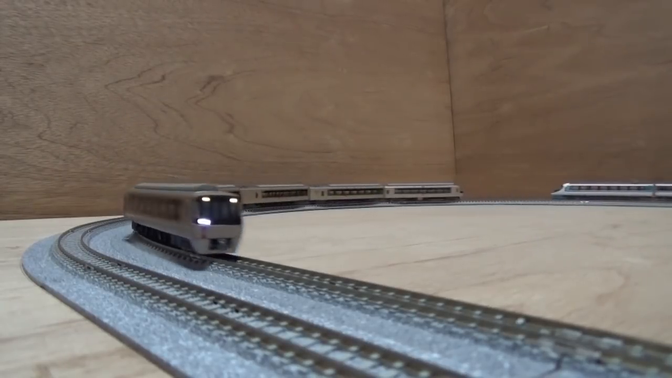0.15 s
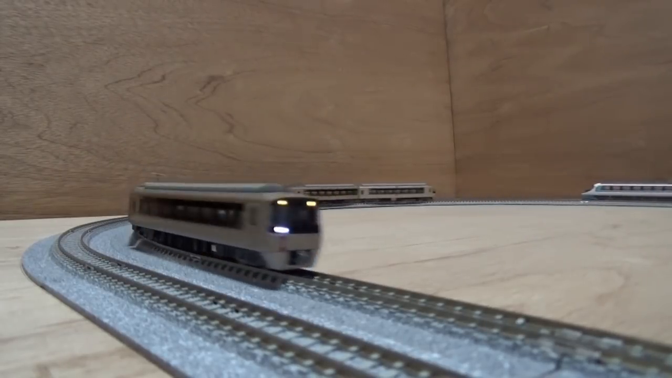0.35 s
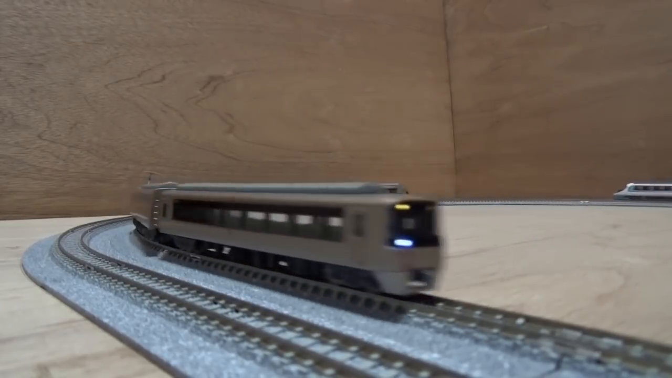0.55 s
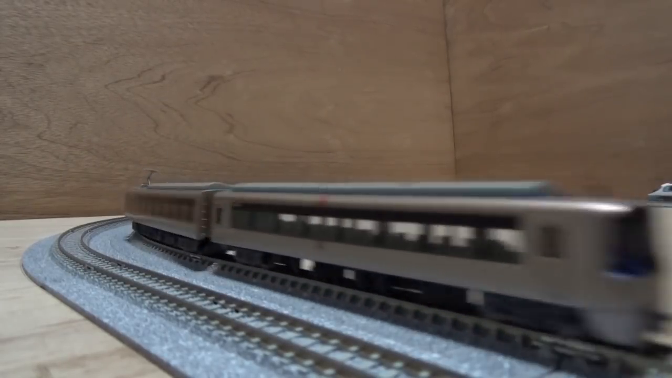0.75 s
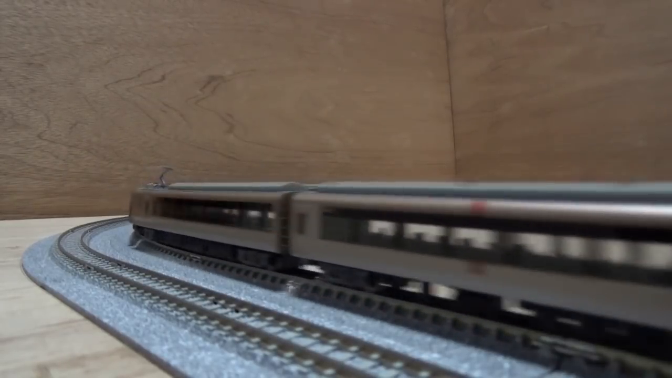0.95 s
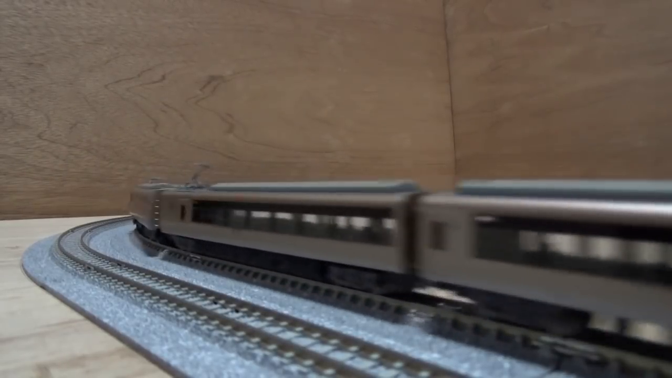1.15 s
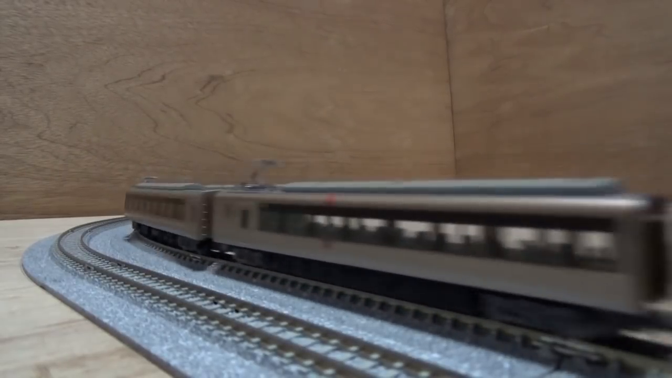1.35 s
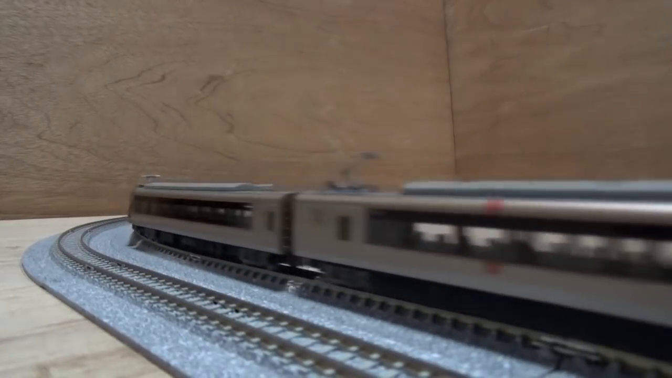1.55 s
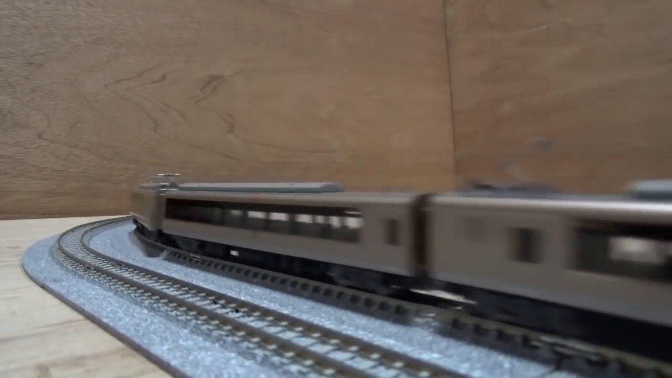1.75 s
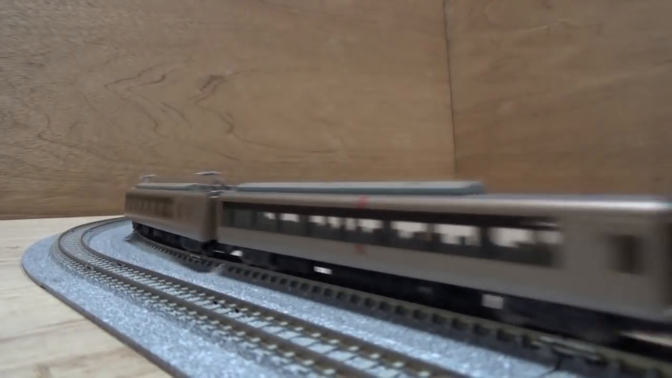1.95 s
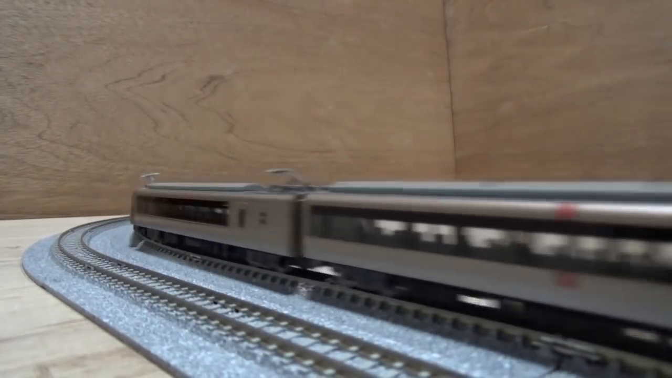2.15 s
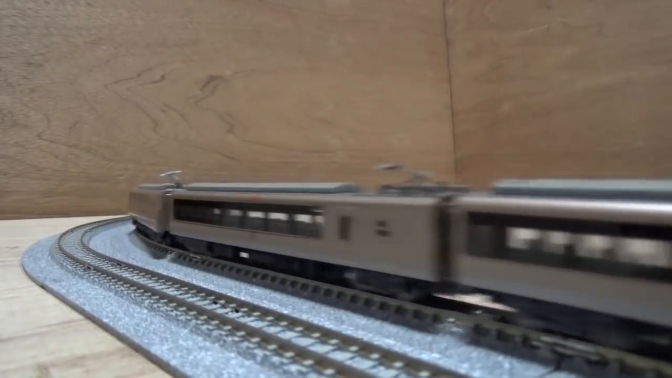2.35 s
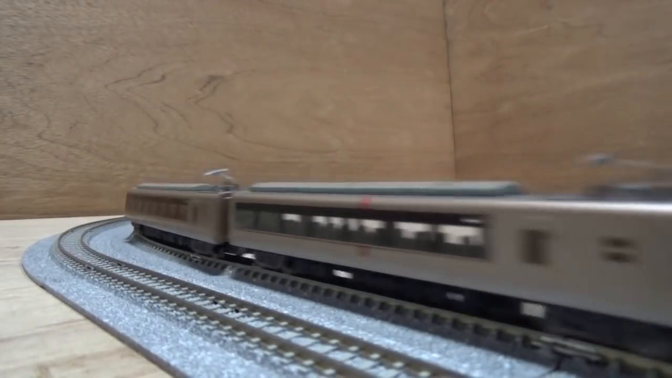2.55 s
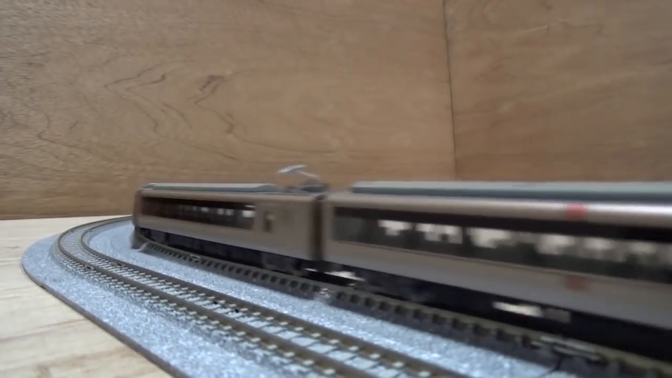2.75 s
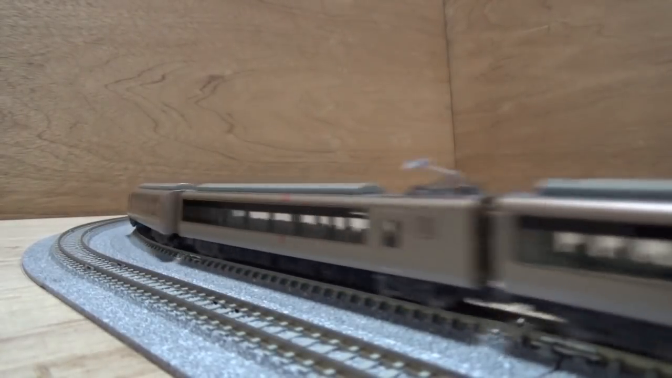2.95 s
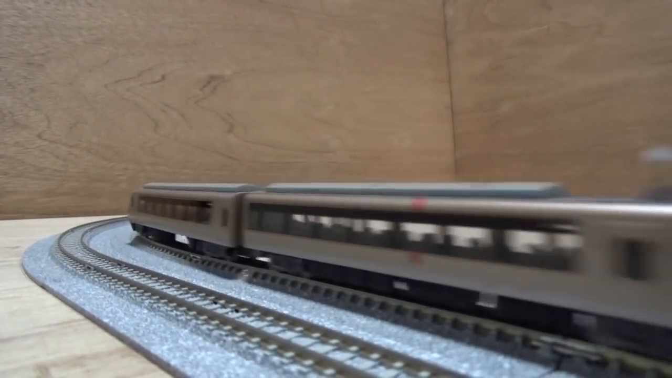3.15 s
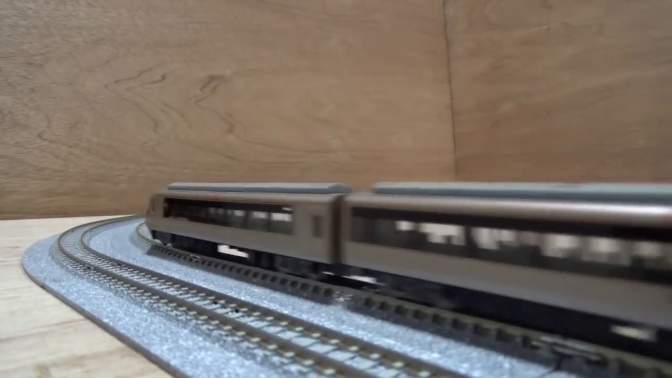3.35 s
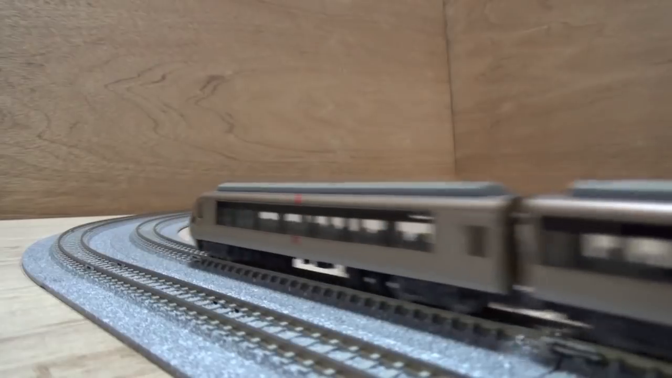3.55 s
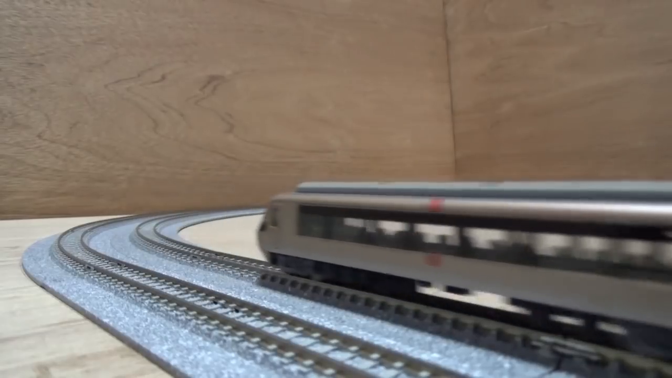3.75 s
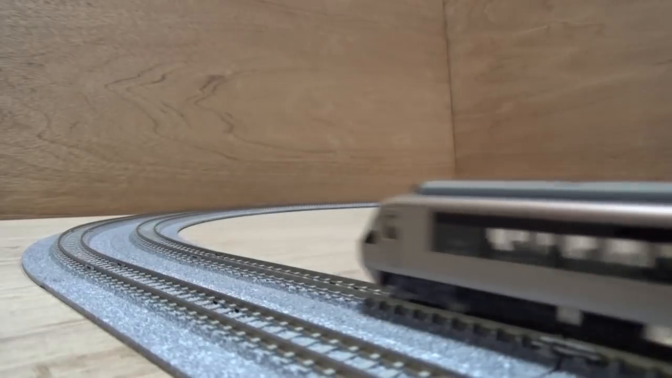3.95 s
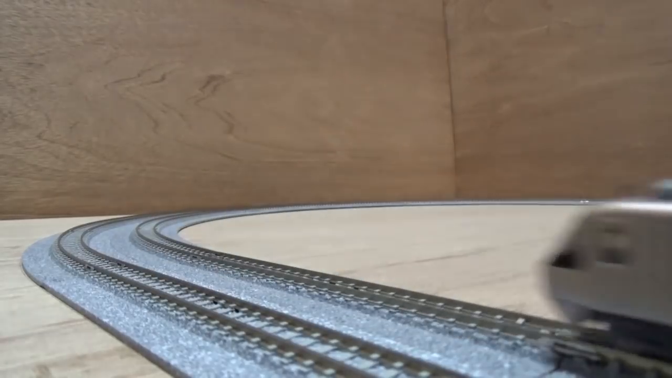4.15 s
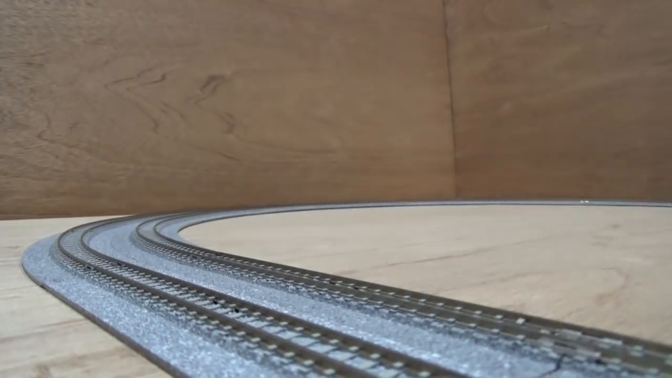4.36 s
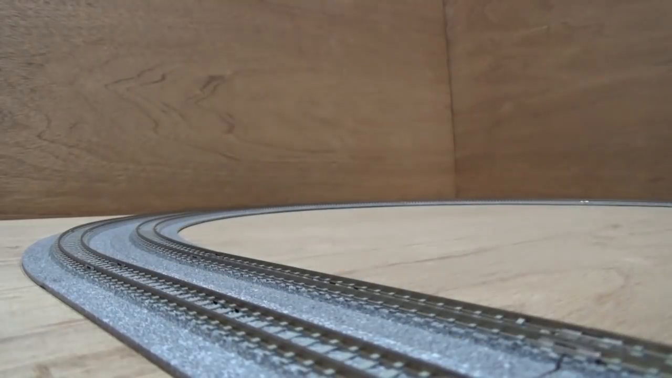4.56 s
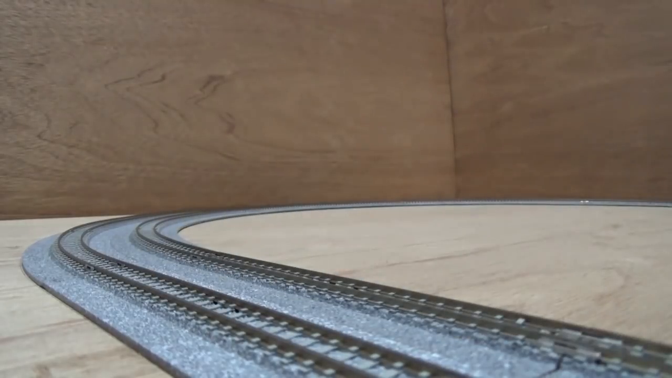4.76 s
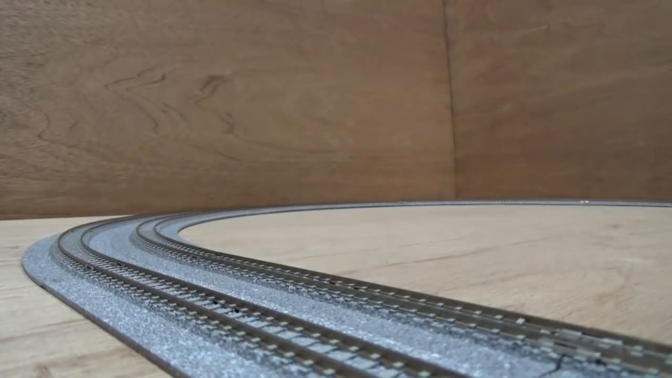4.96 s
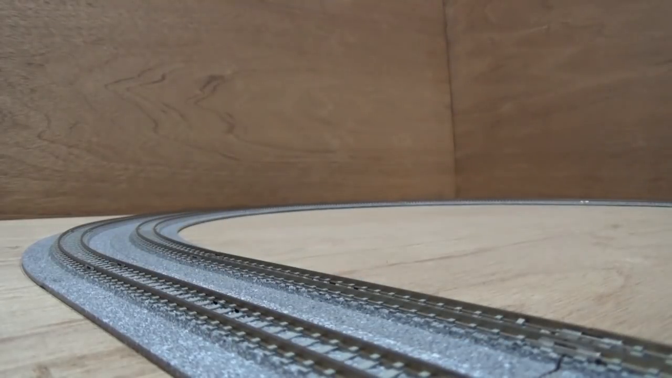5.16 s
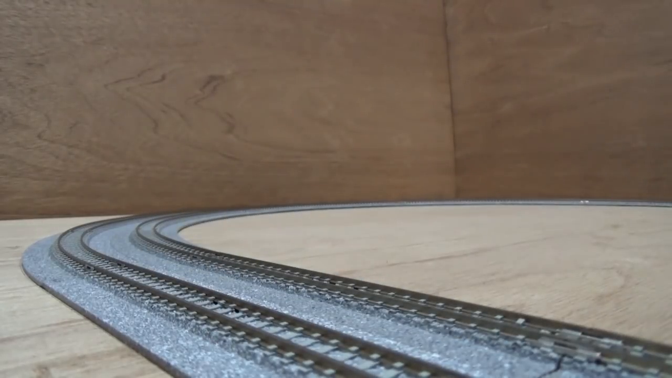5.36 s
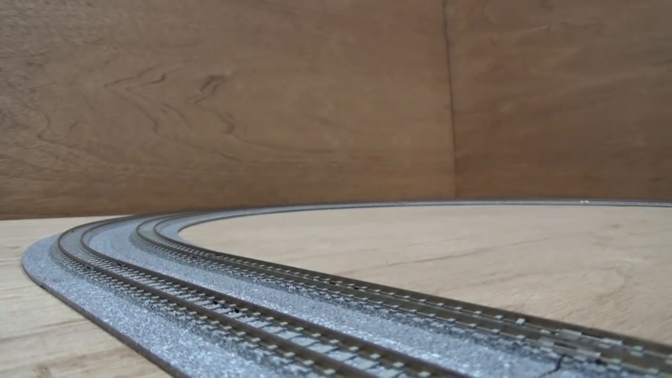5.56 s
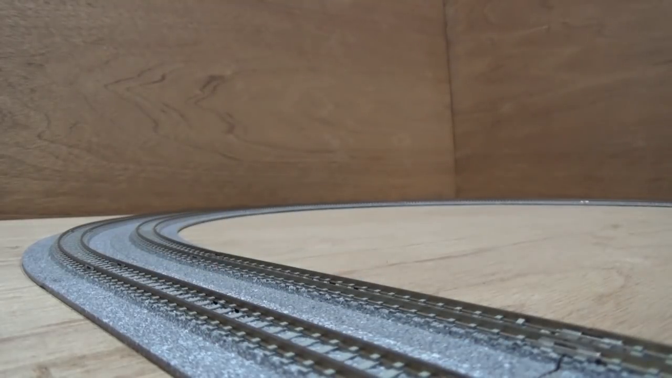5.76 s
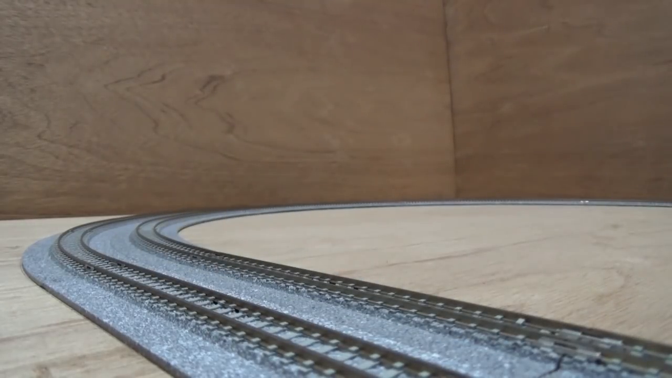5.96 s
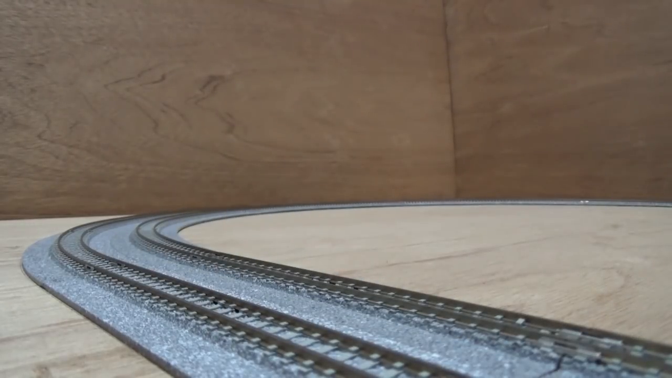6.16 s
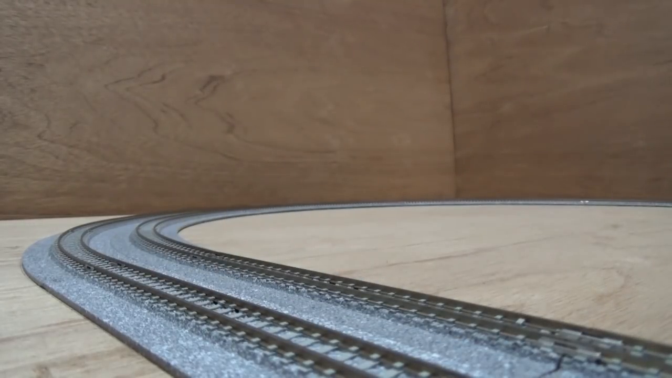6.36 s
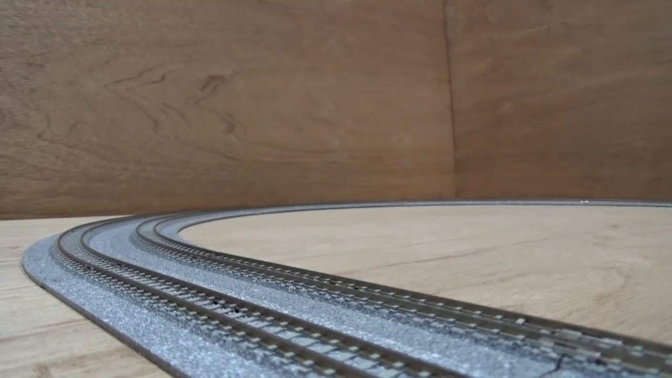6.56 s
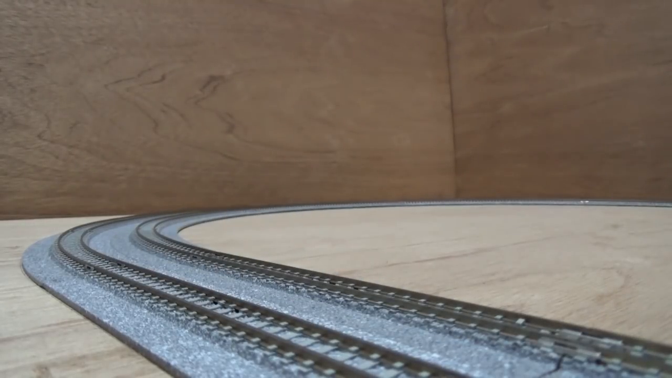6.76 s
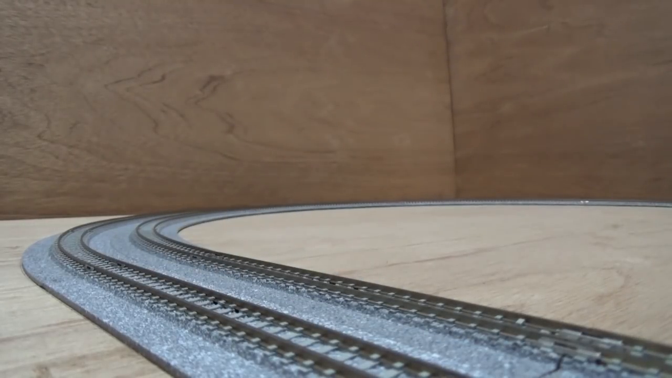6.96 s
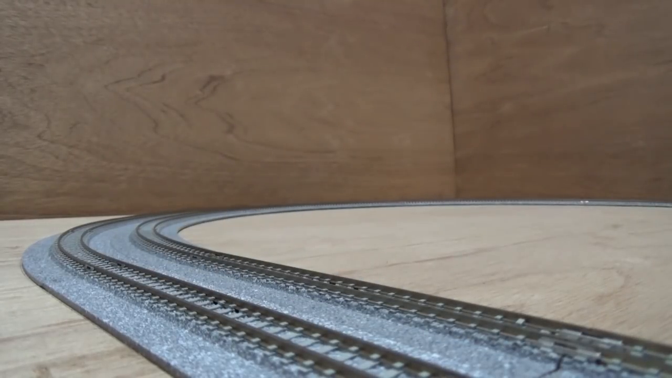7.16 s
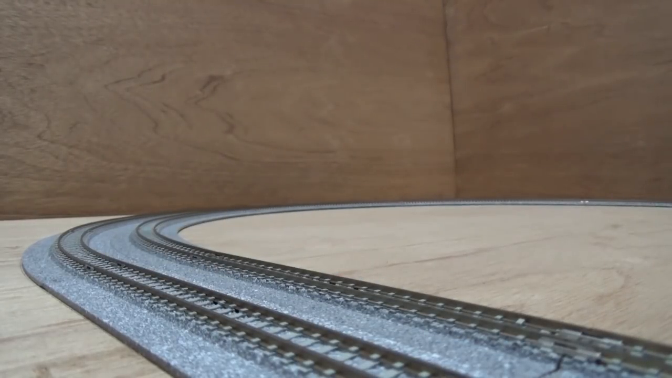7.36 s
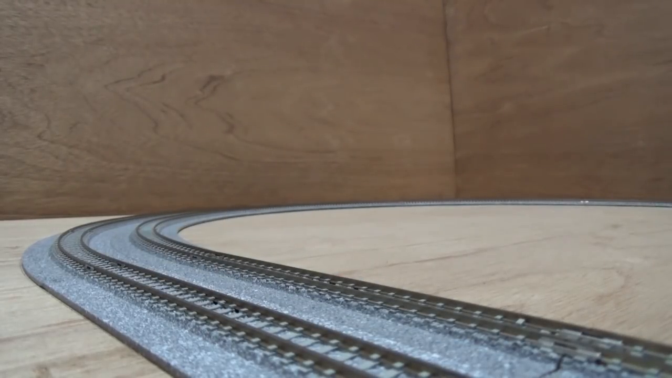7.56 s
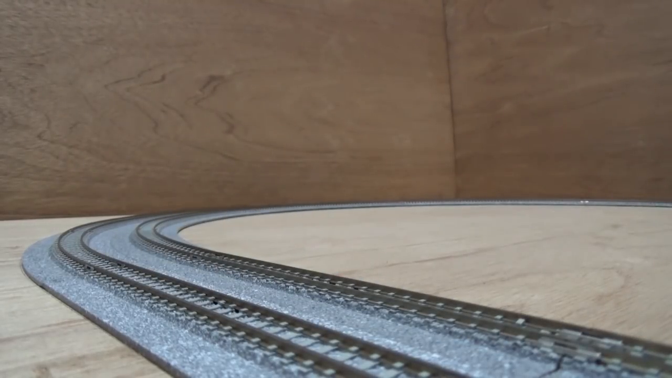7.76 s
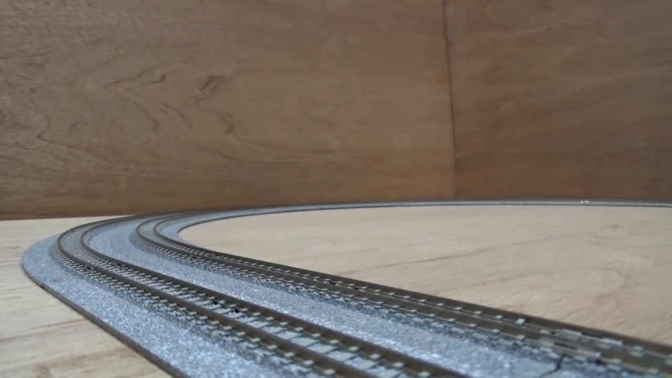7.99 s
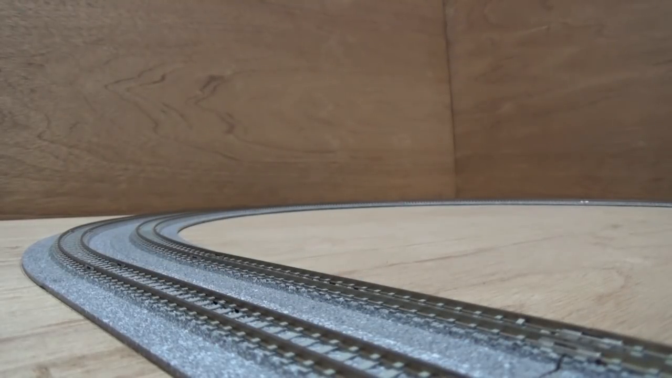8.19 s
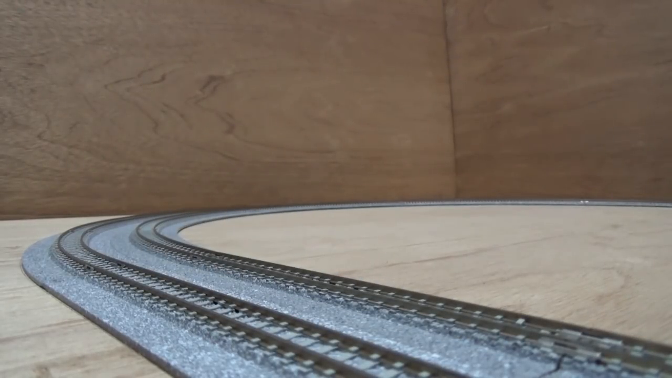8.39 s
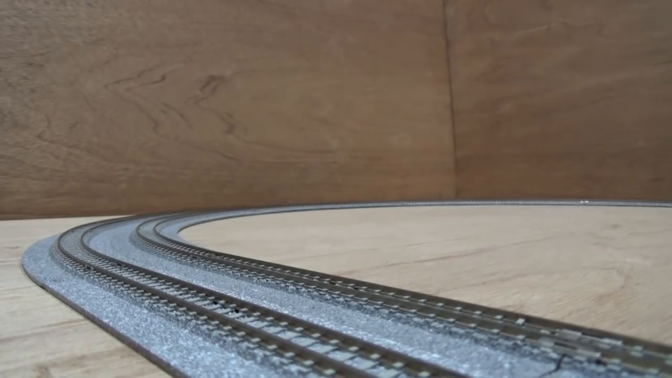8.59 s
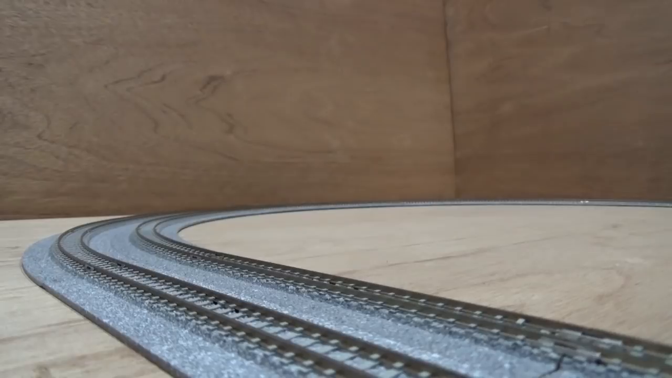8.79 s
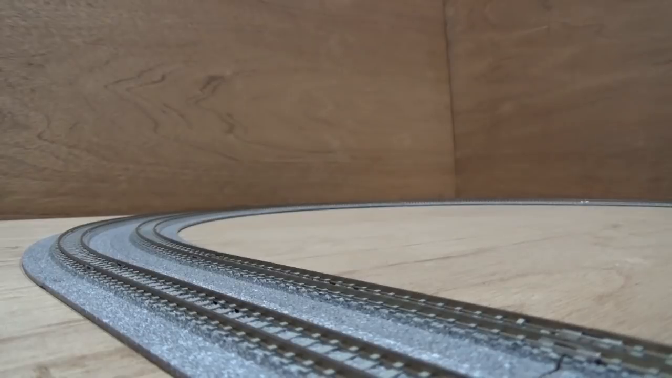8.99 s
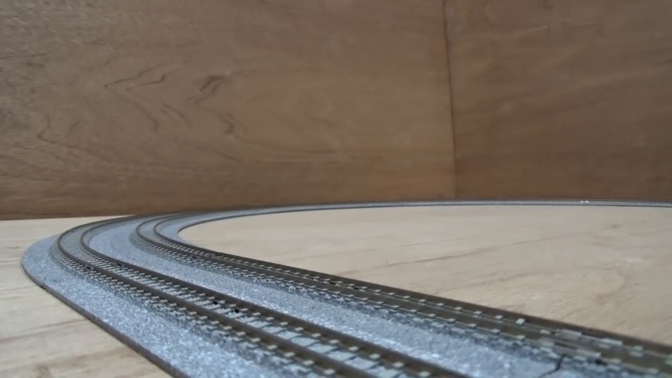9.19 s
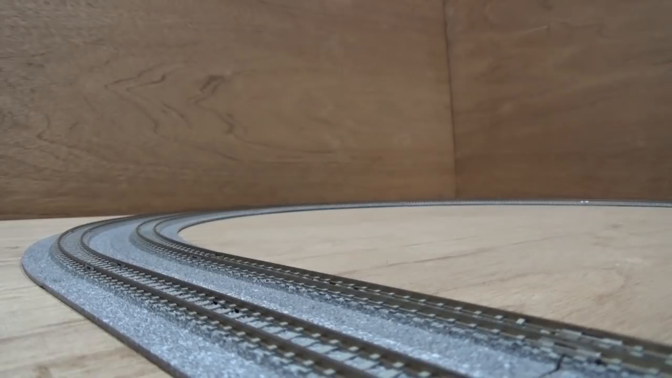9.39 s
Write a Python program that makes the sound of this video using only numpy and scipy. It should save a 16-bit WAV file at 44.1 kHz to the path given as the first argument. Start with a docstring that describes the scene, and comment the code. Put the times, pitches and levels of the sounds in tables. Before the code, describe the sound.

A small model train runs round a curved track on a plywood board, heard from a microphone close to the rails in a quiet room. From 0 s its wheels give a steady, bright, gritty hiss, rising gradually to its fullest at about 2-3 s, with slight flutter, crackle and faint metallic ringing. Dry ticks over rail joints, single or in quick pairs, dot the pass; soft low thumps and hollow knocks come mainly from 0.9 to 1.9 s and again from 3.3 to 4.2 s, towards the right. A motor-like whirr colours the hiss near 3 s. After 3.75 s the sound recedes, with a cluster of clear ticks from 4.2 to 5.5 s. By 7 s only a faint, duller hiss remains, with weak ticks near 6.8, 7.3 and after 8.9 s, uneven low board rumble and a very faint steady mains hum until about 9.4 s.

```python
"""A small model train nears round a curve on a plywood board, its wheels hissing and ticking over rail joints.
It passes close by, bright with gritty crackle and faint rings, while the cars thump the board.
It then runs off to the far side: the hiss sinks, late joints tick weakly and the board booms more.
Wheels and board are filtered noise, joints are short bursts of it, bumps are swelling noise bands.
A faint mains hum, one sine, fills the room throughout."""
import sys
import numpy as np
from scipy import signal
from scipy.fft import rfft, irfft
from scipy.io import wavfile
from scipy.ndimage import uniform_filter1d

SR = 44100
rng = np.random.default_rng(int(sys.argv[2]) if len(sys.argv) > 2 else 0)


def wrap_up_sound(samples):
    """Save the sound to the file named by the first command line argument, as 16-bit audio."""
    columns = np.atleast_2d(samples).T
    # keep every value between -1 and 1, then stretch to whole-number steps
    tamed = np.clip(columns, -1, 1)
    steps = np.round(tamed * 32767).astype(np.int16)
    wavfile.write(sys.argv[1], SR, steps)


N = 415863
T = np.arange(N) / SR  # time of every sample, s
FRAME, OVERLAP = 1024, 768  # short-time spectra, samples
HZ = np.fft.rfftfreq(FRAME, 1 / SR)  # frequency of every bin

# rolling hiss as the train comes close and recedes, before trim and chatter: start_s [s], level_db [dB]
ROLL_LEVEL = [(0, -26), (.5, -25), (.72, -24.5), (1.7, -23), (1.95, -21.5), (2.6, -21.5), (2.92, -21),
              (3.75, -23), (4.45, -26.5), (5.15, -32), (5.75, -35), (6.42, -36.5), (7.1, -44.5),
              (7.95, -45.5), (8.22, -44.5), (8.7, -48.6), (9.1, -46), (9.43, -44.5)]
# brief dips in the level of the hiss: centre_s [s]
HISS_DIPS = [.763, 2.708, 3.275, 3.857]


def wheels(trim_db=0.26, near_grit=0.45, far_grit=0.22, grit_hz=6500, dip_db=3.5, dip_s=0.013):
    """Rolling contact noise: roughness and grit excite wheel and rail; bogie chatter modulates them."""
    near = nearness(T)
    hz = np.fft.rfftfreq(N, 1 / SR)
    grit_share = far_grit + (near_grit - far_grit) * near  # of the power of the rough part
    smooth = rng.standard_normal((2, N))
    rough = np.sqrt(1 - grit_share) * rng.standard_normal((2, N))
    rough = rough + np.sqrt(grit_share) * grit(per_s=900, spread_db=3.5)

    # hard contacts rule the treble, smooth rolling the mids
    treble = hz ** 2 / (hz ** 2 + grit_hz ** 2)
    drive = irfft(np.sqrt(treble) * rfft(rough) + np.sqrt(1 - treble) * rfft(smooth), N)

    dips_db = dip_db * sum(np.exp(-((T - s) / dip_s) ** 2) for s in HISS_DIPS)
    chatter_rms_db = 0.3071 + 0.2739 * near
    chatter_db = chatter_rms_db * waver(rate_hz=21)
    level_db = follow(ROLL_LEVEL, T)[0] + trim_db + chatter_db - dips_db
    return radiate(drive, rolling_colour) * amp(level_db)


def grit(per_s, spread_db, length_s=0.00024):
    """Impulsive excitation: random scrapes on specks and scratches, a few much larger than the rest."""
    happens = rng.random(N) < per_s / SR
    size = happens * amp(spread_db * np.minimum(rng.exponential(1, N), 4))
    contact = np.exp(-abs(np.arange(-128, 129)) / (length_s * SR))  # power rises and falls about each scrape
    power = np.convolve(size ** 2, contact, "same")
    return evened(np.sqrt(power) * rng.standard_normal((2, N)))


# rolling spectra in four places, only their shape counts: pitch_hz [Hz], level_db [dB per Hz]
COMING_SPECTRUM = [(300, -35), (550, -25), (800, -19.5), (1050, -13.5), (1400, -14.5), (2000, -8.5),
                   (3200, -2.5), (4600, -3), (6500, 0.5), (8500, -0.5), (10700, -7), (13000, -10),
                   (15400, -14)]
ALONGSIDE_SPECTRUM = [(300, -37), (550, -27.5), (800, -21), (1050, -15.5), (1400, -10.5), (2000, -9.0),
                      (3200, -5), (4600, -4.5), (6500, 0.0), (8500, -2.5), (10700, -8), (13000, -10),
                      (15400, -18)]
LEAVING_SPECTRUM = [(300, -32), (550, -20.5), (800, -14.5), (1050, -8), (1400, -4), (2000, -2),
                    (3200, -0.5), (4600, -0.5), (6500, 0), (8500, -4.5), (10700, -5), (13000, -8.5),
                    (15400, -14.5)]
FAR_SPECTRUM = [(300, -20), (550, -8), (800, -7), (1050, -1), (1400, 1), (2000, -3), (3200, -1), (4600, 1),
                (6500, -1.5), (8500, -4.5), (10700, -13), (13000, -13.5), (15400, -20)]
# resonances of track and wheels: pitch_hz [Hz], width_hz [Hz], near_lift_db [dB], far_lift_db [dB]
RESONANCES = [(940, 320, -1, 2), (1790, 115, 1.5, 4), (2330, 160, 0.5, -1.5), (2680, 120, -0.5, 2.5),
              (3000, 200, -1.5, 0.5), (3830, 400, 1, 2.5), (4900, 200, 0.5, 1.5), (6640, 400, -0.2, -1),
              (11840, 390, 2, 4.5), (13200, 450, 2, 1)]
# stretches of track that ring as the train rolls over them:
# pitch_hz [Hz], width_hz [Hz], top_s [s], rise_s [s], fall_s [s], lift_db [dB]
SINGING_TRACK = [(2000, 300, .98, 0.12, .25, 4.5), (4160, 890, 1.07, .25, .3, 2.5),
                 (2380, 340, 2.34, .4, 0.22, 3.5), (3850, 280, 5.45, .7, 0.34, 3.5),
                 (2850, 280, 6.3, 1.0, 1.0, 3), (1750, 150, 8, .8, 0.95, 2.5), (860, 220, 8.6, .7, 1.0, 6),
                 (570, 140, 9.4, .7, .7, 6)]
# hollow tone of the track bed: top_s [s], rise_s [s], fall_s [s], lift_db [dB]
HOLLOW_BED = (1.4, .6, 1, 0.96)
# motor car alongside: top_s [s], rise_s [s], fall_s [s], lift_db [dB]
MOTOR_WHIRR = (2.95, 0.44, 1.4, 1.8)
# wheel flanges fizz in the curve: top_s [s], rise_s [s], fall_s [s], lift_db [dB]
FLANGE_FIZZ = [(1.48, 0.23, 0.87, 5), (4.6, 0.59, .6, 2)]


def rolling_colour(t, ripple_db=1.06, flicker_db=1.04):
    """Spectral filtering: place sets the body, resonances lift bands, random patches ripple and flicker."""
    near = nearness(t)
    places = (COMING_SPECTRUM, ALONGSIDE_SPECTRUM, LEAVING_SPECTRUM, FAR_SPECTRUM)
    colour = at_place([read(points, HZ) for points in places], t)
    for hz, width_hz, near_db, far_db in RESONANCES:
        colour = colour + np.outer(resonance(hz, width_hz), near * near_db + (1 - near) * far_db)
    for hz, width_hz, *passing in SINGING_TRACK:
        colour = colour + np.outer(resonance(hz, width_hz), swell(t, *passing))

    hollow_band = np.exp(-np.log((HZ + 1) / 1700) ** 2 / .4)
    whirr_band = np.exp(-((HZ - 5900) / 1100) ** 2)
    fizz_band = (1 + np.tanh((HZ - 11000) / 1400)) / 2  # all above about 11 kHz
    colour = colour + np.outer(hollow_band, swell(t, *HOLLOW_BED))
    colour = colour + np.outer(whirr_band, swell(t, *MOTOR_WHIRR))
    colour = colour + np.outer(fizz_band, sum(swell(t, *row) for row in FLANGE_FIZZ))

    ripple = ripple_db * patches(t, size=(2, 110))  # narrow and slow
    flicker = flicker_db * near * patches(t, size=(16, 7))  # broad and quick, strongest close by
    return colour + ripple + flicker


# a bogie crosses a rail joint: start_s [s], level_db [dB, before the gains in joints()],
# second_axle_s [s after the first; 0 when only one axle strikes]
RAIL_JOINTS = [(.269, -11, .064), (.744, -10, 0), (.867, -10, .063), (.953, -10, 0), (1.298, -9.5, 0),
               (2.429, -9.5, 0), (3.266, -8, 0), (3.58, -8, .061), (3.784, -11, 0), (4.194, -12, .062),
               (4.244, -12, .061), (4.346, -13.5, 0), (4.4315, -9.5, .061), (4.841, -10.7, .063),
               (5.033, -10, .064), (5.4555, -10.5, .066), (6.7805, -25, .068), (7.266, -24.3, .082),
               (8.945, -32, .089), (9.1395, -23.3, 0), (9.339, -23, 0)]
# spectrum of a tick, only its shape counts: pitch_hz [Hz], level_db [dB per Hz]
TICK_SPECTRUM = [(500, -16), (1000, -11.5), (1500, 0.5), (2600, -7), (3900, 2), (5000, -1), (7000, 2.5),
                 (10000, 0.5), (13000, -1), (15500, -3.5)]


def joints(level_db=-7.5, near_db=-2, crossing_s=0.0018, tail_db=-21, tail_s=0.0068):
    """Impact excitation: a wheel drops into a rail gap, rattles briefly, and the track rings weakly."""
    t = np.arange(SR // 10) / SR
    u = t / crossing_s
    contact = (u * np.exp(1 - u)) ** 3
    tail = amp(tail_db) * np.minimum(u, 1) * np.exp(-t / tail_s)
    shape = contact + tail

    blows = np.zeros(N)
    for s, db, gap_s in RAIL_JOINTS + faint_joints():
        axles_s = [s, s + gap_s] if gap_s > crossing_s else [s]
        for axle_s in axles_s:
            part = blows[round(axle_s * SR):][:len(t)]
            part += amp(db) * shape[:len(part)]

    rattle = evened(np.tanh(rng.standard_normal((2, N))))  # contacts of much the same strength
    drive = blows * rattle * amp(level_db + near_db * nearness(T) ** 2)
    return radiate(drive, lambda t: read(TICK_SPECTRUM, HZ)[:, None])


def faint_joints(count=40, per_s=1.5, over_roll_db=1, axle_gap_s=0.068):
    """Poisson process: bogies cross smoother joints at random, as rows like those of RAIL_JOINTS."""
    wait, strength = rng.random((count, 2)).T
    times = np.cumsum(-np.log(1 - wait)) / per_s  # those past the end stay silent
    levels = follow(ROLL_LEVEL, times)[0] + over_roll_db + 20 * np.log10(.5 + strength)
    return [(s, db, axle_gap_s) for s, db in zip(times, levels)]


# rumble of the board, before its random lumps: start_s [s], level_db [dB]
RUMBLE_LEVEL = [(0, -46.5), (.55, -46), (.95, -50), (3.5, -53.5), (4.05, -53.5), (4.9, -56.3), (6.4, -53.5),
                (7.15, -58.5), (7.5, -53), (7.95, -57.5), (8.35, -51.5), (8.75, -56.5), (9.43, -54)]
# spectrum of the board, only its shape counts: pitch_hz [Hz], level_db [dB per Hz]
BOARD_SPECTRUM = [(20, -34), (50, -18), (75, -12), (115, -6.5), (155, -.5), (210, 0), (290, 1), (380, -3.5),
                  (470, -6.5), (620, -13.5), (1000, -27), (2000, -90)]


def board(lumpy_db=1.67, boom_hz=290, boom_width_hz=70, near_boom_db=-3.0, far_boom_db=3):
    """Plate radiation: plywood rumbles under the wheels, its main mode strongest with the train far off."""
    def colour(t):
        """Modal response: the board's spectrum as the train moves."""
        boom_db = far_boom_db + (near_boom_db - far_boom_db) * nearness(t)
        mode = np.exp(-((HZ - boom_hz) / boom_width_hz) ** 2)
        return read(BOARD_SPECTRUM, HZ)[:, None] + np.outer(mode, boom_db)

    rumble = radiate(rng.standard_normal((2, N)), colour)
    return rumble * amp(follow(RUMBLE_LEVEL, T)[0] + lumpy_db * waver(rate_hz=32))


# passing cars knock the board, levels before the gains in bumps():
# start_s [s], thump_db [dB], bed_ring_db [dB]
CAR_BUMPS = [(0.889, -50, -36.5), (1.299, -43, -39), (1.399, -54, -42), (1.649, -47, -41.5),
             (1.889, -52, -37), (3.269, -55, -65), (3.849, -44, -45), (4.189, -47, -55)]
# the track bed drones under the first cars: top_s [s], rise_s [s], fall_s [s], lift_db [dB]
BED_DRONE = (1.54, 1, 1.5, 30)


def bumps(knock_db=-0.5, drone_rest_db=-78.5, peak_s=0.0058):
    """Forced vibration: cars thump the board; the hollow track bed on the right knocks and drones."""
    thump, knock = np.zeros(N), np.zeros(N)
    for s, thump_db, bed_db in CAR_BUMPS:
        age = np.maximum(T - s, 0) / peak_s
        blow = age * np.exp(1 - age)
        thump += amp(thump_db) * blow
        knock += amp(bed_db + knock_db) * blow
    drone = amp(drone_rest_db + swell(T, *BED_DRONE))
    bed = knock * band(lo_hz=420, hi_hz=900) + drone * band(lo_hz=600, hi_hz=760)
    thump_sides = amp([[-8], [-2]])  # left, right
    bed_sides = amp([[-12], [5]]) * [[-1], [1]]  # the left in opposite phase
    return thump * band(lo_hz=28, hi_hz=140) * thump_sides + bed * bed_sides


def hum(pitch_hz=50.4, left_db=-71, right_db=-69):
    """Pure tone: steady mains hum as one sine, its levels rms."""
    tone = np.sqrt(2) * np.sin(2 * np.pi * pitch_hz * T)
    return tone * amp([[left_db], [right_db]])


# likeness of left and right: pitch_hz [Hz], correlation [-1 to 1]
LIKENESS = [(60, 1), (350, 0.89), (600, 0.87), (850, 0.54), (1300, 0.86), (2500, 0.97), (9000, 0.87),
            (15000, 1)]
# left minus right at each place: pitch_hz [Hz], coming_db [dB], alongside_db [dB], leaving_db [dB], far_db [dB]
LEFT_MINUS_RIGHT = [(60, -2, 4, -3, -7), (180, -2.5, -20, -8, -2), (418, 0.5, -15.5, 2, -7.5),
                    (710, -12, -18, -13, 0), (1060, -13, -17, -12.5, -3), (1440, 1, -7, -1, -2),
                    (2800, 1.5, -3.5, -4, 2), (6000, -0.3, -1.1, -1, -3), (12000, 0.5, -0.6, 0, -.4)]
# lean to the right as the last car leaves: top_s [s], rise_s [s], fall_s [s], left_minus_right_db [dB]
EXIT_LEAN = (4, 0.7, 2, -2.5)


def radiate(drive, colour, flip_db=-13, flip_width_db=3):
    """Stereo coherence: two unrelated drives are coloured by colour(s) in dB and spread by the train's place."""
    _, t, (direct, diffuse) = signal.stft(drive, SR, nperseg=FRAME, noverlap=OVERLAP)
    pan_hz, *pans = np.transpose(LEFT_MINUS_RIGHT)
    pan_db = at_place([read(list(zip(pan_hz, p)), HZ) for p in pans], t)
    lean_band = np.exp(-np.log((HZ + 1) / 3500) ** 2)
    pan_db = pan_db + np.outer(lean_band, swell(t, *EXIT_LEAN))

    # a sound far to the right reaches the left channel in opposite phase
    flip = (1 + np.tanh((flip_db - pan_db) / flip_width_db)) / 2
    pan = amp(pan_db) * np.exp(-1j * np.pi * flip)

    same = np.clip(read(LIKENESS, HZ), -1, 1)[:, None]
    shared = np.sqrt((1 + same) / 2) * direct
    apart = np.sqrt((1 - same) / 2) * diffuse
    sides = np.array([(shared + apart) * pan, shared - apart])
    sides = sides * 2 / abs(1 + pan)  # panning leaves the shared part of left plus right alone

    gain = amp(colour(t))
    gain = gain / np.sqrt(np.mean(gain ** 2, axis=0))  # colour leaves the power alone
    return signal.istft(sides * gain, SR, nperseg=FRAME, noverlap=OVERLAP)[1][:, :N]


# where the train is: start_s [s], place [0 coming, 1 alongside, 2 leaving, 3 far side]
TRAIN_PLACE = [(0, 0), (.65, 0.22), (1.0, 1.1), (1.8, 1.07), (3.7, 1.14), (4.9, 1.5), (5.5, 2), (6.3, 2),
               (8.0, 2.5)]


def at_place(spectra, t):
    """Linear interpolation: blends the four places' spectra as the train moves on, bins x times."""
    place = np.clip(follow(TRAIN_PLACE, t)[0], 0, 3)
    return sum(np.outer(s, np.maximum(1 - abs(place - k), 0)) for k, s in enumerate(spectra))


def nearness(t, far_db=-44, near_db=-27):
    """Distance by loudness: 0 where the hiss is far-side faint, 1 where it is loud as the train passes."""
    return np.clip((follow(ROLL_LEVEL, t)[0] - far_db) / (near_db - far_db), 0, 1)


def swell(t, top_s, rise_s, fall_s, db):
    """Two-sided Gaussian envelope: a smooth change in dB that comes and goes."""
    return db * np.exp(-((t - top_s) / np.where(t < top_s, rise_s, fall_s)) ** 2)


def resonance(hz, width_hz):
    """Lorentzian resonance: a bell of height 1 over frequency."""
    return 1 / (1 + (2 * (HZ - hz) / width_hz) ** 2)


def patches(t, size):
    """Smoothed random field: patches of rms 1, size = (bins, frames) across."""
    field = rng.standard_normal((len(HZ), len(t)))
    field = uniform_filter1d(field, size[0], axis=0)
    return evened(uniform_filter1d(field, size[1], axis=1))


def waver(rate_hz):
    """Band-limited modulation: slow chance of rms 1, up to about the given rate."""
    f = np.fft.rfftfreq(N, 1 / SR)
    shape = f / (f + 2) / (1 + (f / rate_hz) ** 2)
    return evened(irfft(rfft(rng.standard_normal(N)) * shape, N))


def band(lo_hz, hi_hz):
    """Band-pass filtering: noise of rms 1 between two edges."""
    edges = signal.butter(2, [lo_hz, hi_hz], "band", fs=SR, output="sos")
    return evened(signal.sosfilt(edges, rng.standard_normal(N)))


def read(points, hz):
    """Log-frequency interpolation: a spectrum table at the frequencies hz."""
    f, value = np.transpose(points)
    return np.interp(np.log(hz + 1), np.log(f + 1), value)


def follow(rows, t):
    """Linear interpolation in time: every column of a curve table at the times t."""
    s, *columns = np.transpose(rows)
    return [np.interp(t, s, c) for c in columns]


def amp(db):
    """Logarithmic level: decibels to amplitude gain."""
    return 10 ** (np.asarray(db) / 20)


def evened(x):
    """Power normalisation: scales to an rms of 1."""
    return x / np.sqrt(np.mean(x ** 2) + 1e-20)


def scene():
    """Superposition: the train, its track and the room add up."""
    return wheels() + joints() + board() + bumps() + hum()


def record(dry, edge_hz=15600):
    """Band limiting: a linear-phase low-pass removes the top treble."""
    lowpass = signal.firwin(511, edge_hz, window=("kaiser", 9), fs=SR)
    return signal.oaconvolve(dry, lowpass[None], "same")


dry = scene()
out = record(dry)
wrap_up_sound(out)
```